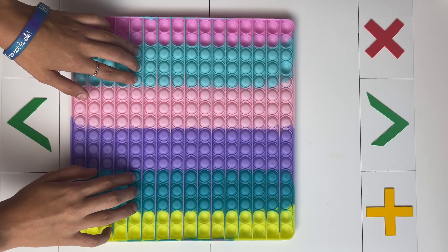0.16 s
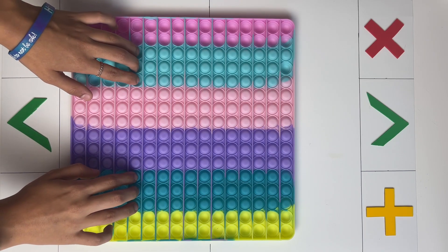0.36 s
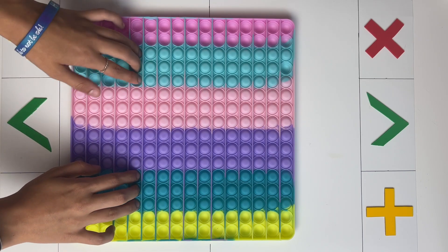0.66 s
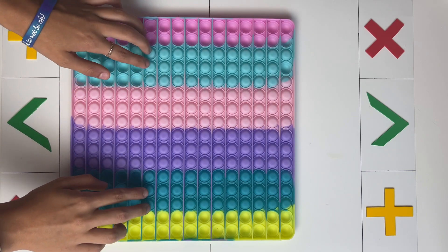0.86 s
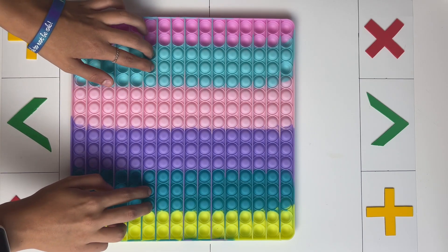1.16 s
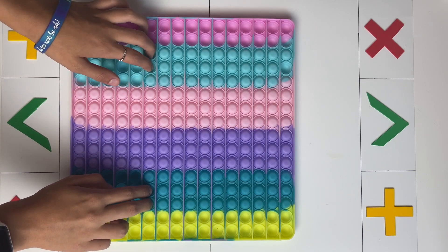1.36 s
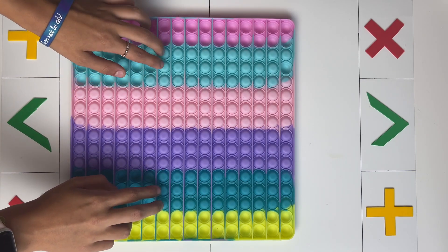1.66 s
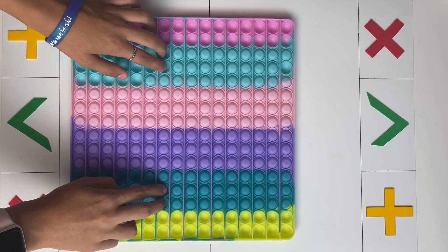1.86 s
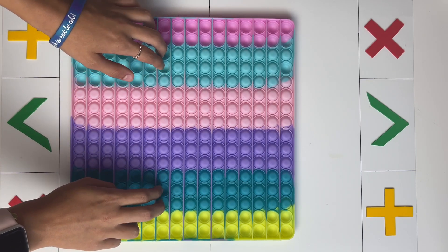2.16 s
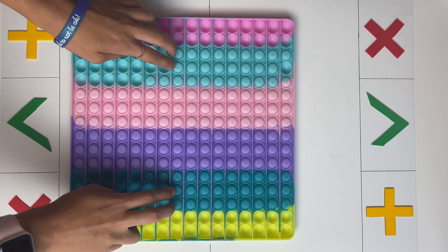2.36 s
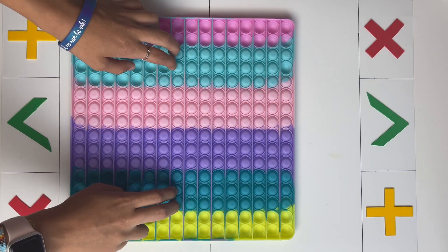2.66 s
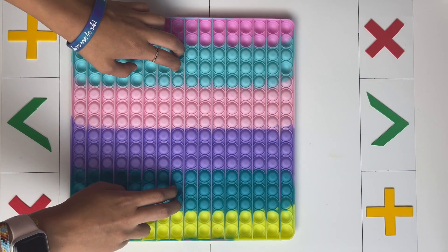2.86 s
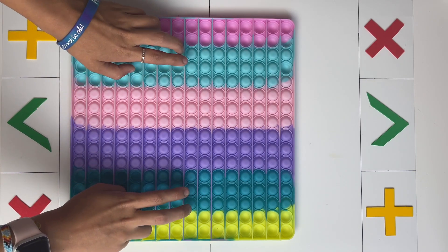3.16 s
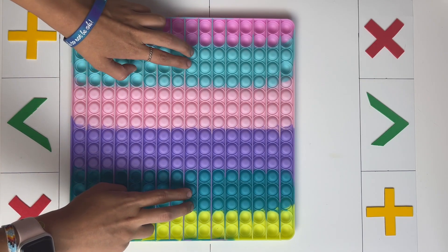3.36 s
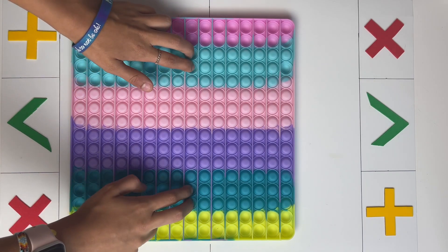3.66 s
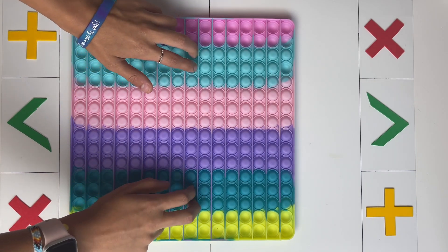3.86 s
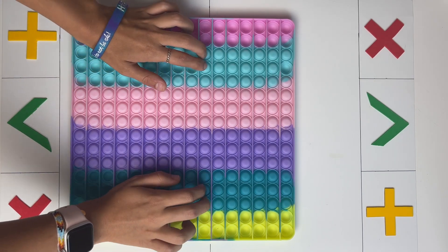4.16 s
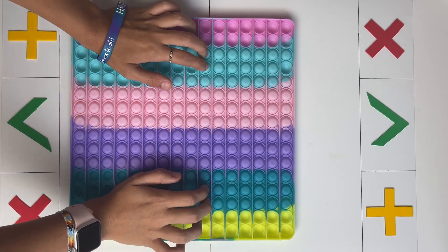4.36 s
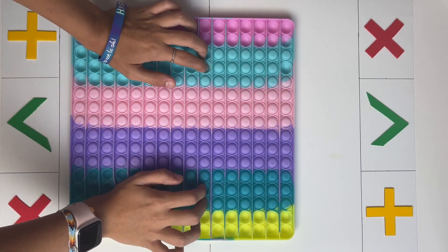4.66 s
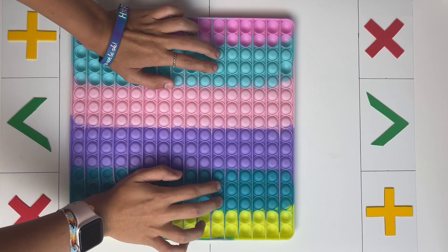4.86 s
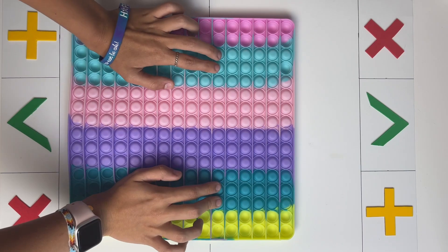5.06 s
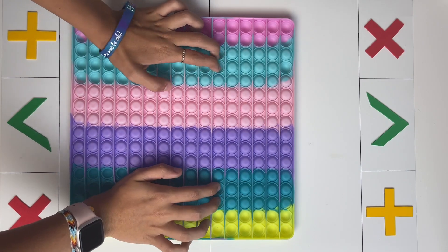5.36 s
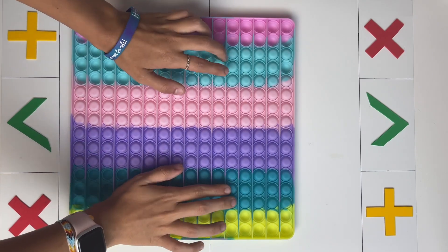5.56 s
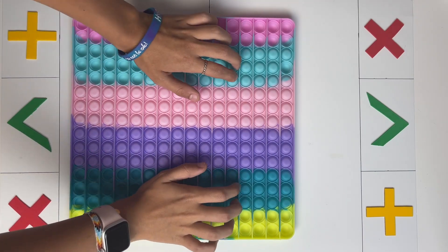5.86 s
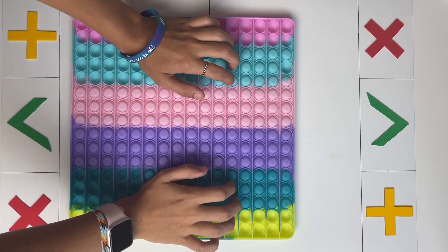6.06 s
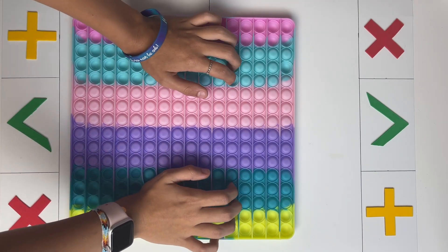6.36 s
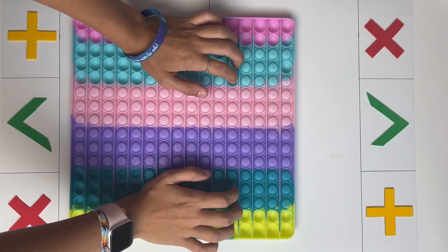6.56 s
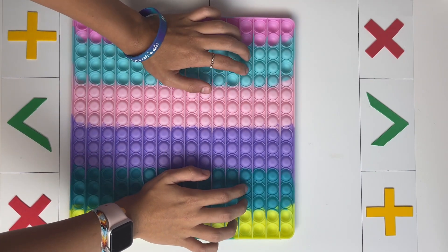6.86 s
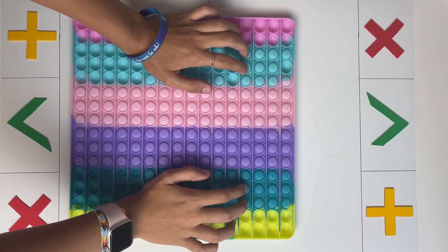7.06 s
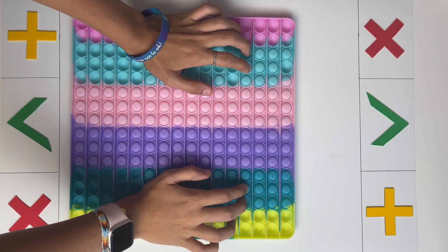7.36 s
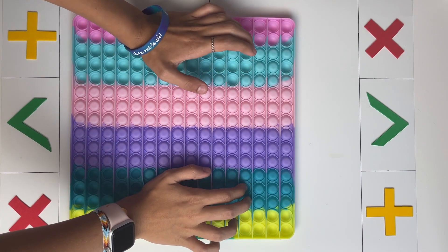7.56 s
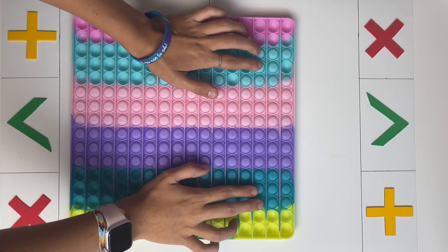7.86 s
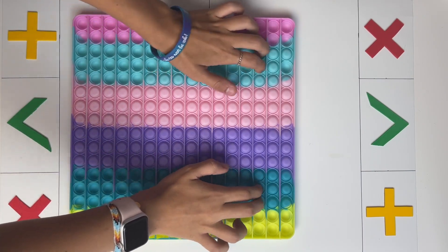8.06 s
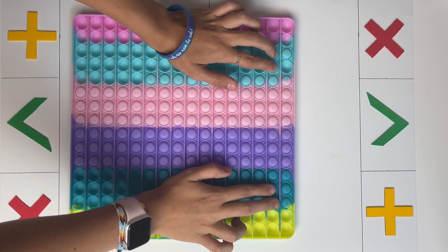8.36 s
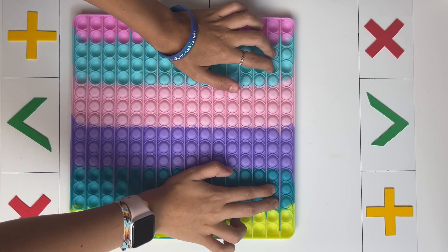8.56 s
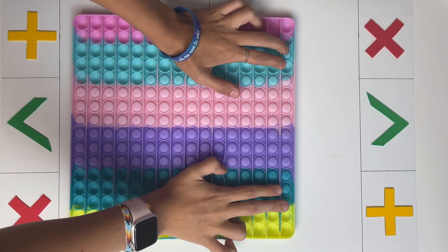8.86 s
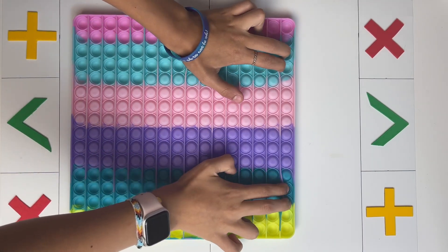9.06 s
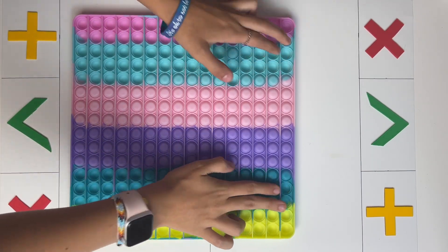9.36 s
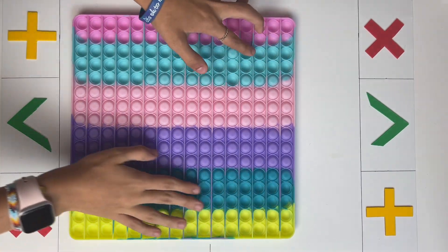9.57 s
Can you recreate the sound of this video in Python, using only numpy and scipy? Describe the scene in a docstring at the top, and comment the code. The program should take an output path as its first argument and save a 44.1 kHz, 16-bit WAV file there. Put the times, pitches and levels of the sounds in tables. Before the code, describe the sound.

Fingers press a silicone bubble toy on a table, making loud, close pops in short irregular bursts over a faint hum.

```python
"""Popping a silicone bubble board

Fingers press the domes through on a table below a phone. Each dome snaps over with a crack and a
short hollow pop; the table rings and carries the blow up the stand first. Fingertips tap and brush
the board between pops. A small room answers over a low hum; the loudest pops clip."""
import sys
import numpy as np
from scipy import signal
from scipy.fft import rfft, irfft, next_fast_len
from scipy.io import wavfile
from scipy.ndimage import map_coordinates

SR = 44100
rng = np.random.default_rng(int(sys.argv[2]) if len(sys.argv) > 2 else 0)


def master(y):
    """Save y as 16-bit WAV."""
    cut = np.clip(np.atleast_2d(y).T, -1, 1)
    pcm = np.round(cut * 32767)  # scale
    wavfile.write(sys.argv[1], SR, pcm.astype(np.int16))


N = 428211


def amp(db):
    """Decibels to gain."""
    return 10 ** (np.asarray(db) / 20)


def unit_rms(x):
    """x scaled to rms 1."""
    return x / np.sqrt(np.mean(x ** 2) + 1e-20)


def along(points, hz, column=1):
    """A table column, interpolated over log frequency."""
    rows = np.array(points, float)
    return np.interp(np.log(hz + 1), np.log(rows[:, 0] + 1), rows[:, column])


def filtered(x, response):
    """x through a complex frequency response."""
    size = next_fast_len(x.shape[-1] + 4096)
    return irfft(rfft(x, size) * response(np.fft.rfftfreq(size, 1 / SR)), size)[..., :x.shape[-1]]


def resonance(hz, centre_hz, width_hz):
    """Two-pole band-pass response."""
    return 1j * hz * width_hz / (centre_hz ** 2 - hz * hz + 1j * hz * width_hz)


def stereo_noise(spectrum, coherence):
    """Noise of a given spectrum and left-right coherence."""
    noise = filtered(rng.standard_normal((2, N)), lambda hz: amp(along(spectrum, hz)))
    angle = lambda hz: np.arccos(np.clip(along(coherence, hz), -1, 1)) / 2
    mid, side = filtered(noise, lambda hz: np.array([np.cos(angle(hz)), np.sin(angle(hz))]))
    return np.array([mid + side, mid - side])


def wobble(rate_hz):
    """Smooth random curve."""
    knots = rng.standard_normal(int(N * rate_hz / SR) + 4)
    return map_coordinates(knots, [np.arange(N) * rate_hz / SR])


def ring(t, hz, t60_s, attack_s):
    """Damped sine from t = 0."""
    t = np.maximum(t, 0)
    return np.sin(2 * np.pi * hz * t) * amp(-60 * t / t60_s) * (1 - np.exp(-t / attack_s))


def add(track, start_s, sound):
    """Mixes sound into track."""
    part = track[:, round(start_s * SR):][:, :sound.shape[1]]
    part += sound[:, :part.shape[1]]


# Dome snaps: (time [s], level [dB], hollow pitch [Hz], crack [dB re level], sheen [dB re level],
# table ring [dB re level], favoured table pitch [Hz])
DOME_POPS = [(0.185, 9.5, 1393, -8.5, -19, -19, 719), (0.3403, 10.5, 1467, -7.5, -15, -19, 622),
             (0.3421, 12.5, 1633, -10.5, -14.5, -22, 597), (0.3911, 7.5, 1356, -10, -7, -17.5, 565),
             (0.4749, 4.5, 1188, -11, -11.5, -17, 559.6), (0.4805, 11, 1415, -18, -21, -22, 550),
             (1.0112, 8.5, 1432, -5, -13, -18, 570), (1.0134, 11, 1412, -9.5, -15.5, -21.5, 874),
             (1.1952, 7, 1402, -5.5, -9, -16, 651), (1.2684, 10, 1443, -17.5, -25.5, -22, 579.5),
             (1.8247, 12, 1345, -14.5, -16.5, -27, 704), (1.845, 12.5, 1396, -6, -11.5, -27, 724),
             (1.8554, 6.5, 1414, -3.5, -6, -13, 628.7), (1.8598, 4, 1223, -5.5, -3, -22, 626.4),
             (2.6504, 7, 1219, -6.5, -7.5, -28, 760), (2.7703, 10, 1262, -7, -7, -18, 630),
             (2.7715, -1, 910, 2.5, 2, -9, 644), (2.7876, 11.5, 1354, -10.5, -14, -23.5, 620),
             (3.5011, 11.5, 1128, -12.5, -17.5, -25.5, 697.5), (3.5378, 10.5, 1132, -9, -16, -15.5, 626.3),
             (3.5937, 10, 1375, -15.5, -23.5, -20, 539), (3.6749, 7.5, 1353, -8.5, -7, -20, 737),
             (4.4767, 12, 1348, -10.5, -15, -23, 657), (4.5044, 10, 1453, -6.5, -13, -18, 671.7),
             (4.5197, 11, 1397, -20, -22, -33, 686), (4.6303, 7.5, 1306, -9.5, -12.5, -16, 575),
             (5.2242, 10, 1171, -12.5, -17, -18, 576.4), (5.244, 10, 1412, -12.5, -20, -18, 673.5),
             (5.2997, 8.5, 1093, -12, -20.5, -16, 609), (5.3808, 8, 932, -8.5, -21, -13, 651.7),
             (6.3697, 3.5, 1387, -18.5, -11.5, -20, 568), (6.372, 12.5, 1466, -9.5, -17.5, -20.5, 574),
             (6.4065, 8.5, 1272, -8.5, -16, -18, 739.4), (6.4148, 5, 1390, -18.5, -12.5, -14, 600),
             (7.1547, 7.5, 1459, -5, -10.5, -15, 729), (7.2129, 11.5, 1212, -11.5, -15.5, -21.5, 719),
             (7.3242, 10, 1205, -13, -18, -22.5, 739.5), (7.5434, 8.5, 1121, -11.5, -18, -15, 676),
             (7.9809, 11, 1366, -6.5, -16.5, -17, 716), (8.0131, 8, 1121, -15.5, -16.5, -14, 640),
             (8.0386, 3.5, 1348, -1.5, 1, -18.5, 680), (8.5458, 4.5, 1357, -9, -13, -14, 552),
             (8.6362, 7.5, 1337, -14, -5, -24.5, 665), (8.6593, 1.5, 1404, -6.5, -15.5, -13.5, 610),
             (8.9421, 4, 1334, -7.5, -18.5, -18.5, 682), (8.9781, 6.5, 1450, -11, -26, -15.5, 560),
             (8.9977, 3, 1180, -8.5, -21.5, -6.5, 592)]
def dome_pops():
    """A dome cracks over: its skin rings, and its air pocket drops in pitch as the skin flips."""
    snap_db, taut_snap_hz, sheen_hz = -8.5, 3090, 6250  # sheen: a high mode of the taut skin
    taut_sheen_db, sag_hz_per_db, boost_db_per_db = -18, 64, 0.31  # slack skin snaps lower and louder
    stand_lead_s = 0.0022  # table and stand carry the blow faster than air
    out, t = np.zeros((2, N)), np.arange(SR // 5) / SR
    air_t = t - stand_lead_s
    arrived, age_s = air_t >= 0, np.maximum(air_t, 0)
    click = arrived * (1 - age_s / 0.00005) * np.exp(-age_s / 0.00005)
    glide_t = air_t + 0.00025 * (1 - np.exp(-age_s / 0.00019))
    for time_s, level_db, hollow_hz, crack_db, sheen_db, table_db, favoured_hz in DOME_POPS:
        hollow = ring(glide_t, hollow_hz, t60_s=0.0045, attack_s=0.00073)
        spray = arrived * amp(-6 - 60 * age_s / 0.0049) * np.diff(rng.standard_normal(len(t) + 1))
        crack = amp(crack_db) * (click + spray)
        slack_db = max(taut_sheen_db - sheen_db, 0)
        snap_hz = taut_snap_hz - sag_hz_per_db * slack_db
        snap = -amp(snap_db + boost_db_per_db * slack_db) * ring(air_t, snap_hz, 0.003, 0.0001)
        sheen = amp(sheen_db) * ring(air_t, sheen_hz, 0.0018, 0.0001)
        stand = -amp(-21) * ring(t, 1100, 0.012, 0.0003)
        wood = amp(table_db) * table_ring(t, favoured_hz, t60_scale=0.82)
        pop = amp(level_db) * (hollow + crack + snap + sheen + stand + wood)
        add(out, time_s - stand_lead_s, in_room(pop, wet_db=-3))
    return out


# Table-top modes: (frequency [Hz], level [dB], t60 [s])
TABLE_MODES = [(137, -4.5, 0.3), (172, -7, 0.16), (245, -13, 0.06), (421.4, -6, 0.044), (466, -8, 0.042),
               (571.9, -6.5, 0.06), (672.6, -3.5, 0.032), (765.5, -2.5, 0.045), (902, 0.5, 0.02),
               (1070, 1.5, 0.025), (1111.7, -7.5, 0.12), (1630, -7.5, 0.029), (1630, -8, 0.011),
               (1640, -4.5, 0.021), (1970, 10, 0.012)]
def table_ring(t, favoured_hz, t60_scale):
    """The struck spot favours modes near one pitch; hands damp most of each, a weak part rings on."""
    rolloff_db_per_octave = 16.5
    hz, level_db, t60_s = np.transpose(TABLE_MODES)[:, :, None]
    spread_db, detune = rng.standard_normal((2, len(hz), 1)) * [[[2]], [[0.006]]]
    spot_db = -rolloff_db_per_octave * abs(np.log2(hz / favoured_hz))
    hz = hz * (1 + detune)
    damped = ring(t, hz, t60_scale * t60_s, 0.0042)
    lingering = amp(-15.5) * ring(t, hz, 3.4 * t60_scale * t60_s, 0.0043)
    polarity = (-1.) ** np.arange(len(hz))
    return polarity @ (amp(level_db + spot_db + spread_db) * (damped + lingering))


# Fingertips landing or lifting: (time [s], level [dB], tick pitch [Hz], thud [dB re tick])
FINGER_TAPS = [(1.5971, -51, 3070, -9), (2.0996, -49.5, 1910, -5.5), (3.8876, -53, 2150, 3.5),
               (3.9186, -48, 2430, 9), (4.0008, -49, 2140, 9.5), (4.0392, -38, 2520, 0),
               (4.0774, -61, 1960, 9.5), (4.304, -42, 2870, -18.5), (5.2085, -32.5, 1900, 6.5),
               (5.5589, -43, 3100, 0), (5.708, -45, 2510, -4), (5.7772, -46.5, 3810, -7),
               (5.7994, -48.5, 2300, -6.5), (7.768, -47.5, 1300, -3), (7.8799, -42, 2140, -16.5),
               (7.944, -50, 2100, -6), (8.225, -36, 2780, -1), (8.604, -30.5, 1300, 2),
               (9.216, -40.5, 1990, -15.5), (9.2489, -43, 2220, -16), (9.3554, -44, 2250, 0.5),
               (9.4253, -49, 2400, 11.5), (9.4375, -28, 2170, -5.5), (9.5335, -38, 1990, -3),
               (9.618, -32.5, 1930, 3.5)]
def finger_taps():
    """A fingertip gives a tacky tick, then a soft thud as its weight comes down."""
    out, t = np.zeros((2, N)), np.arange(SR // 10) / SR
    for time_s, level_db, tick_hz, thud_db in FINGER_TAPS:
        puff = rng.standard_normal(len(t)) * amp(-60 * t / 0.01) * (1 - np.exp(-t / 0.002))
        tick = filtered(puff, lambda hz: resonance(hz, tick_hz, width_hz=1800) ** 2)
        thud = table_ring(t - 0.003, favoured_hz=590, t60_scale=0.4)
        tap = tick / abs(tick).max() + amp(thud_db) * thud / abs(thud).max()
        add(out, time_s, in_room(amp(level_db) * tap, wet_db=-2))
    return out


# Strokes over the board: (start [s], length [s], drag [dB], hiss [dB])
STROKES = [(3.851, 0.05, -40, -51.5), (3.967, 0.1, -48.5, -63), (4.2, 0.26, -58.5, -59),
           (5.971, 0.15, -61.5, -72), (7.899, 0.15, -50.5, -53.5), (8.201, 0.034, -40.5, -56.5),
           (9.183, 0.36, -54, -60.5), (9.33, 0.15, -44.5, -57.5), (9.508, 0.16, -52.5, -61.5),
           (9.603, 0.033, -45, -65.5)]
# Low drag and high hiss, band-limited at about 12 kHz: (frequency [Hz], relative density [dB])
DRAG_SPECTRUM = [(120, -7), (300, 9.5), (600, 5.5), (1200, -0.5), (2500, -52.5)]
HISS_SPECTRUM = [(800, -17.5), (2000, 2.5), (3500, -2), (6000, -10), (12000, -12), (13000, -40)]
# Stroke stereo image: (frequency [Hz], coherence [ratio])
STROKE_COHERENCE = [(200, 1), (700, 0.58), (1400, 0.55), (3000, 0.66), (12000, 0.69)]
def hand_slides():
    """Skin drags unevenly over silicone; each stroke swells in and trails off."""
    rise_s, fade_t60_s = 0.05, 0.31
    t = np.arange(SR * 3 // 4) / SR
    drag, hiss = (unit_rms(amp(3 * wobble(30)) * stereo_noise(spectrum, STROKE_COHERENCE))
                  for spectrum in (DRAG_SPECTRUM, HISS_SPECTRUM))
    envelopes = np.zeros((2, N))
    for start_s, length_s, drag_db, hiss_db in STROKES:
        swell = np.clip(t / rise_s, 0, 1) ** 2
        fade = amp(-60 * np.maximum(t - length_s, 0) / fade_t60_s)
        add(envelopes, start_s, amp([[drag_db], [hiss_db]]) * swell * fade)
    return envelopes[0] * drag + envelopes[1] * hiss


# Room tail, cut short and quiet above about 12.5 kHz by a treble roll-off:
# (frequency [Hz], t60 [s], relative level [dB], coherence [ratio])
ROLLED_OFF_TAIL = [(147, 0.74, 4.5, 0.99), (300, 0.2, -5, 1), (640, 0.4, -2, 0.89),
                   (1500, 0.44, -5.5, 0.11), (2530, 0.46, -5.5, 0.67), (5060, 0.46, -2.5, 0.93),
                   (12400, .32, -1.5, 0.25), (13300, 0.12, -14, 1)]
# Scatter off hands and board, mostly short waves: (frequency [Hz], relative level [dB])
EARLY_SCATTER = [(300, -2.5), (1500, -2.5), (3500, 14.5), (11000, 6), (13000, -13.5)]
# Reflections off near surfaces: (delay [s], level [dB])
NEAR_ECHOES = [(.0032, -19.5), (.0049, -12), (.0098, -25), (0.0125, -21.5)]
def in_room(sound, wet_db):
    """Direct sound, near echoes, early scatter and a room tail with its top treble rolled off."""
    scatter_t60_s, onset_s = 0.028, 0.00033
    hz, t, (mid, side) = signal.stft(rng.standard_normal((2, SR // 2)), SR, nperseg=256)
    hz = hz[:, None]
    t60_s, level_db, coherence = (along(ROLLED_OFF_TAIL, hz, column) for column in (1, 2, 3))
    angle = np.arccos(np.clip(coherence, -1, 1)) / 2
    mid, side = np.cos(angle) * mid, np.sin(angle) * side
    decay = amp(level_db - 60 * t / t60_s) + amp(along(EARLY_SCATTER, hz) - 60 * t / scatter_t60_s)
    response = signal.istft(decay * [mid + side, mid - side], SR, nperseg=256)[1]
    response *= amp(wet_db) / np.linalg.norm(response[0])
    response *= np.clip(np.arange(response.shape[1]) / SR / onset_s, 0, 1)
    response[:, 0] = 1  # direct path
    for delay_s, echo_db in NEAR_ECHOES:
        delay_samples = round(SR * delay_s * rng.uniform(0.94, 1.06)) + rng.integers(0, 3, 2)
        response[[0, 1], delay_samples] += amp(echo_db)
    return signal.fftconvolve(sound[None], response, axes=1)


def hum():
    """Two close tones beat; a low mode hums on the room's rumble and is jolted by each pop."""
    tones_hz, tones_db, beat_hz, beat_peak_s = 86.96, -46.5, 3.43, 0.826
    mode_hz, mode_db, jolt_re_pop_db = 88.3, -54, -49
    t = np.arange(N) / SR
    tones = 2 * np.cos(np.pi * beat_hz * (t - beat_peak_s)) * np.sin(2 * np.pi * tones_hz * t)
    waver_db = 1.5 * wobble(1.6)
    mode = filtered(rng.standard_normal((1, N)), lambda hz: resonance(hz, mode_hz, width_hz=17))
    out = amp(tones_db + waver_db) * tones + amp(mode_db) * unit_rms(mode)
    jolt = ring(t[None, :SR // 2], mode_hz, t60_s=0.4, attack_s=0.013)
    for time_s, pop_db, *_ in DOME_POPS:
        add(out, time_s, amp(pop_db + jolt_re_pop_db) * rng.standard_normal() * jolt)
    return out


# Band-limited noise floor: (frequency [Hz], relative density [dB])
FLOOR_SPECTRUM = [(15, -64.5), (25, -34), (53, -12.5), (70, -2), (90, -10), (118, -13.5), (177, -13),
                  (232, -24.5), (280, -19), (445, -28), (900, -44), (2400, -51), (7200, -54.5),
                  (11900, -46.5), (13000, -70), (16500, -72)]
# Its stereo image: (frequency [Hz], coherence before clipping to +-1 [ratio])
FLOOR_COHERENCE = [(60, 1), (200, 0.96), (400, -0.0085), (800, 0.33), (1300, -1.4), (2400, 0.73),
                   (12000, -0.29)]
def noise_floor():
    """Room rumble and faint hiss, band-limited at about 12 kHz; the level wavers slightly."""
    noise = stereo_noise(FLOOR_SPECTRUM, FLOOR_COHERENCE)
    return amp(-50 + 0.7 * wobble(6)) * unit_rms(noise)


# Microphone port response: (frequency [Hz], gain [dB])
PORT_GAIN = [(30, -22.5), (130, 7.5), (400, 8.5), (2000, 5), (2600, -4.5), (3200, -3.5), (4300, -3),
             (6200, -1.5), (7300, 3.5), (8500, 1), (11000, -8), (13500, -3.5), (15400, -5.5),
             (17000, -12.5)]
# Left-right phase shift that widens the treble: (frequency [Hz], left lead [rad])
WIDENING_PHASE = [(30, 0), (2070, -.2), (3500, .3), (4200, .8), (6200, .9), (7150, 2.8), (8270, 6.1),
                  (9850, 6.3), (10800, 7.7), (12500, 9.3), (16000, 10)]
def phone_response(hz):
    """The microphone ports colour the sound; the phone's stereo processing widens the treble."""
    half_lead_rad = 0.5 * along(WIDENING_PHASE, hz)
    return amp(along(PORT_GAIN, hz)) * np.exp(1j * np.array([half_lead_rad, -half_lead_rad]))


def scene():
    """Pops and taps, coloured and widened, over slides, noise floor and hum."""
    impacts = filtered(dome_pops() + finger_taps(), phone_response)
    return impacts + hand_slides() + noise_floor() + hum()


def record(dry):
    """Soft clip at full scale, then a band limit."""
    stop_hz, taper_hz = 16800, 400
    clipped = dry / (1 + np.abs(dry) ** 12) ** (1 / 12)
    limited = filtered(clipped, lambda hz: np.clip((stop_hz - hz) / taper_hz, 0, 1) ** 2)
    return np.clip(limited, -1, 1)


dry = scene()
out = record(dry)
master(out)
```